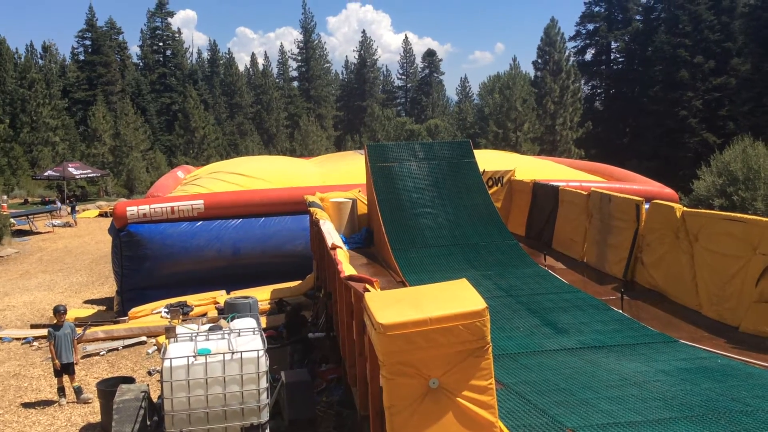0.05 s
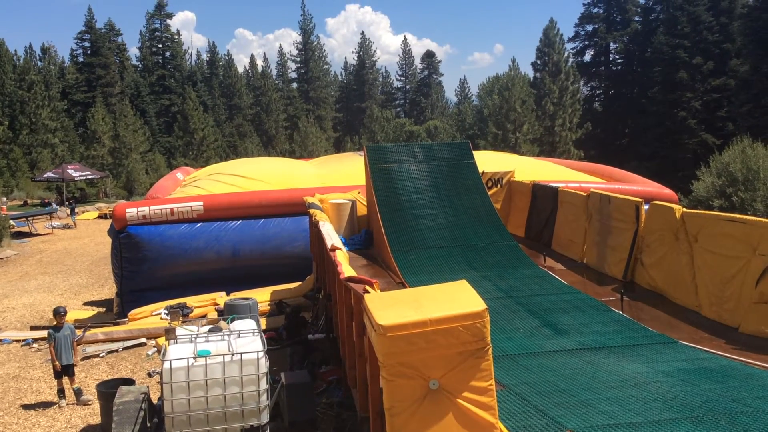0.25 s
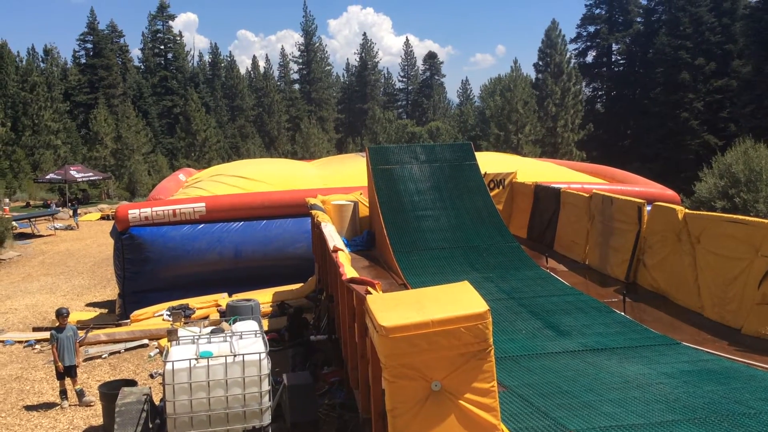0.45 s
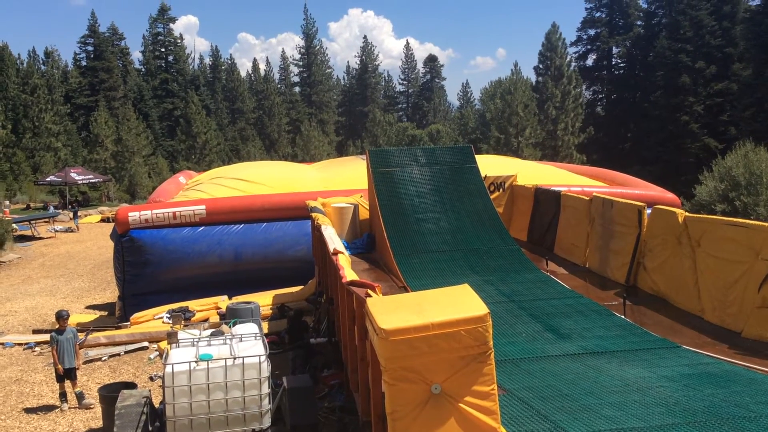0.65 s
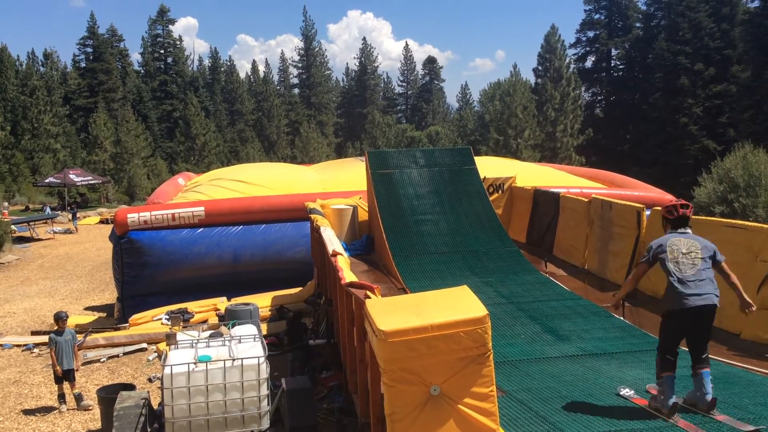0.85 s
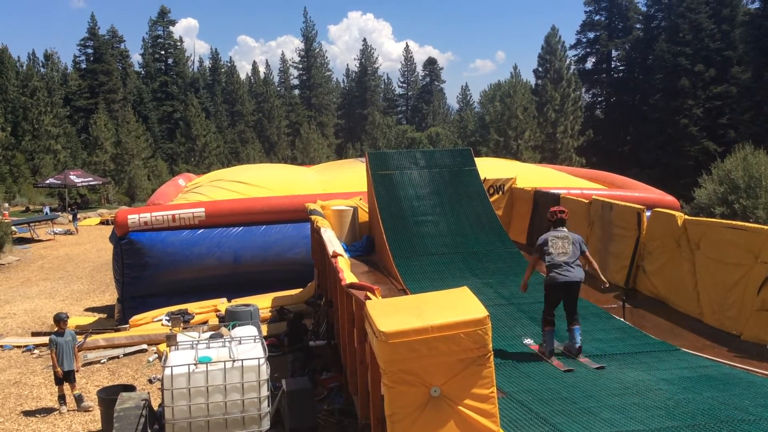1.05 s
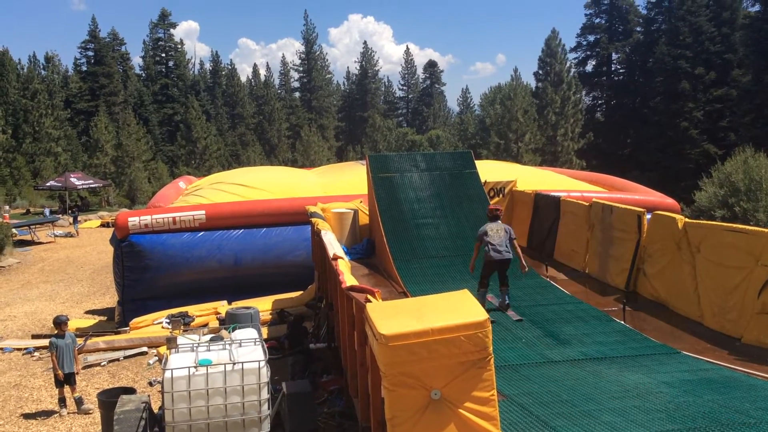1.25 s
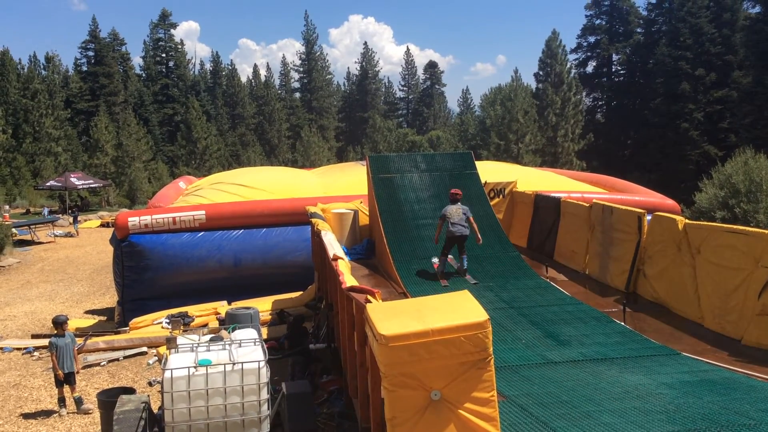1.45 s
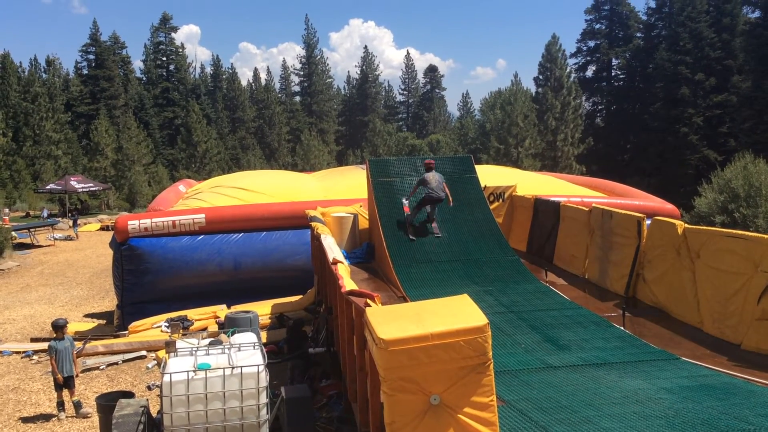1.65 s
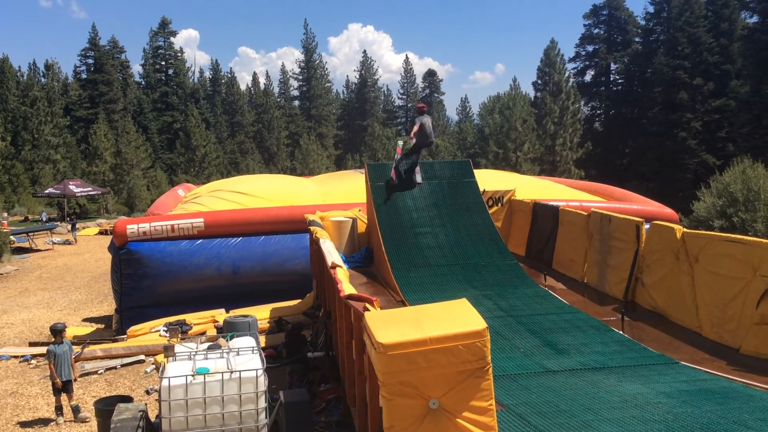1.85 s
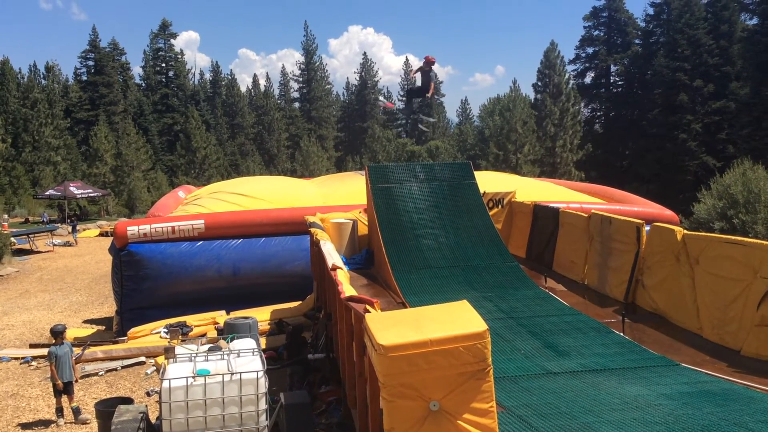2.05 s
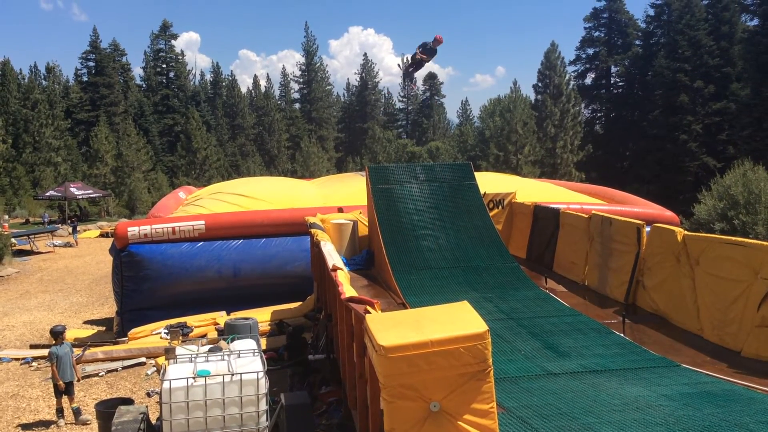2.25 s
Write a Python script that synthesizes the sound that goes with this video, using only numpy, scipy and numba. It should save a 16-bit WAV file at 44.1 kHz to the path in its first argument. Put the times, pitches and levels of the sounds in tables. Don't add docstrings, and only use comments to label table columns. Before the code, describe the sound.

Skis rush past and up a plastic bristle-mat jump ramp with loud rasping hiss, then airborne quiet

```python
import sys
import numpy as np
from scipy import signal
from scipy.io import wavfile
from scipy.ndimage import uniform_filter1d
from numba import njit

SR = 44100
rng = np.random.default_rng(int(sys.argv[2]) if len(sys.argv) > 2 else 0)


def how_loud(loudness_db):
    steps = np.asarray(loudness_db, float) / 20
    return 10 ** steps


def store_pcm(level_fs):
    pcm = np.round(np.clip(level_fs, -1, 1) * 32767).astype(np.int16)
    wavfile.write(sys.argv[1], SR, np.atleast_2d(pcm).T)


N = 101429

# f/Hz, density/dB per Hz
AIR_SPECTRUM = [(18, -36), (30, 3), (113, 6.5), (404, -40), (538, -10), (953, -22), (1650, -20.5),
                (1780, -17.5), (15000, -52)]
# f/Hz, width/Hz, level/dB
FAN_HUM = [(90, 72, -50), (117.3, 8.7, -62), (160, 49, -50)]

# t/s, level/dB
DECK_DRUMMING = [(0, -49.5), (.13, -48), (.3, -41), (.5, -32.5), (.68, -38), (.8, -30.5), (.92, -43.5),
                 (1.15, -48), (1.35, -44.5), (1.65, -44), (1.97, -41), (2.08, -54), (2.14, -51),
                 (2.19, -52), (2.25, -68), (2.3, -47)]
# f/Hz, width/Hz, level/dB
BOARD_MODES = [(72, 45, -4), (130, 64, -2), (184, 51, -6.5), (276, 99, -8)]
# t/s, peak/dB, f/Hz, ring T60/ms
BOARD_THUMPS = [(0.141, -28.5, 88.5, 120), (0.207, -30.5, 325, 44), (0.386, -15.5, 160, 29),
                (0.391, -35, 100, 98), (.43, -32, 61.5, 160), (0.433, -24.5, 202, 67),
                (0.443, -19.5, 270, 31), (0.494, -21.5, 252, 27), (0.526, -23, 140, 79),
                (0.558, -26, 253, 130), (.626, -23.5, 168, 64), (0.728, -21.5, 160, 130),
                (0.73, -28.5, 272, 190), (0.819, -25, 304, 100), (0.829, -24.5, 157, 105),
                (1.047, -23.5, 145, 23), (1.1, -29.5, 92.7, 160), (1.166, -26, 154, 80),
                (1.801, -33.5, 84, 88), (0.744, -26, 203, 71), (1.932, -47, 130, 170),
                (1.992, -48, 140, 120)]

# t/s, peak/dB, rasp re peak/dB, snap re peak/dB, length/ms
JOINT_SLAPS = [(0.136, -39.5, -15, -25, 14), (0.203, -40, 4.5, 6, 8), (0.381, -24.5, 6, 0, 6.8),
               (.386, -24.5, -2, 7, 6.5), (0.443, -37.5, 8, -20, 21), (0.491, -30, 6, -20, 12.5),
               (0.52, -25.5, 1.5, -21, 16), (0.551, -25, 5, -31, 8.2), (0.561, -26, -21, -25, 7.5),
               (0.621, -25, 5, -6, 18), (0.641, -34, 11, -4, 8.9), (0.673, -29.5, -4, 0, 9.7),
               (0.723, -27, 12.5, -9, 17), (0.729, -31, 3, -14, 4.6), (0.766, -42, 15, 4, 5.6),
               (0.941, -37, -8, -18, 3.5), (1.045, -37, 1, -20, 8), (1.157, -29.5, 8.5, -14, 6.6),
               (1.163, -26.5, -1.5, -14, 17), (1.538, -33, -3, -22, 15), (1.65, -31, -2, -24, 25),
               (2.188, -51, 12, -4, 5.8)]
# f/Hz, width/Hz, level/dB
CRACK_MODES = [(547, 550, 3), (806, 840, 1.5), (1120, 880, 9), (1510, 680, -8)]
# f/Hz, width/Hz, level/dB
SNAP_MODES = [(5230, 760, 3), (9500, 3300, 7.5), (12600, 3200, -24)]

# t/s,
# peak/dB, f/Hz, half length/ms
SNAGS_AND_RINGS = [(.388, -26, 540, 3.7), (.527, -32, 895, 3), (.558, -30, 760, 2.8), (.63, -33.5, 900, 3.4),
                   (.73, -27.5, 1010, 3), (1.157, -32, 1890, 1.9), (.556, -17, 2830, 3.8),
                   (0.574, -20.5, 3140, 3.4), (0.595, -23, 2800, 4), (0.613, -21, 3000, 4),
                   (.628, -15, 3080, 3.1), (0.642, -23, 3000, 4), (.655, -39, 3160, 4), (0.665, -27, 3000, 3),
                   (.676, -17.5, 3090, 4), (0.692, -18, 3130, 2.1), (.711, -20, 3000, 4),
                   (.729, -18.5, 2010, 2.1), (.736, -21, 3000, 2.1), (.748, -23, 3000, 2.8),
                   (0.77, -21, 2800, 7.2), (0.786, -29, 2900, 3.7), (0.799, -27.5, 2720, 6.6),
                   (0.818, -31, 3050, 4), (0.843, -26, 3000, 7.7), (0.869, -30, 3000, 3.6),
                   (0.882, -31, 3100, 3.5), (.872, -33, 2040, 7), (.892, -35, 2200, 5), (.946, -34, 1180, 4),
                   (.942, -31, 3000, 4), (1.161, -43, 2780, 2.5), (1.17, -41, 3200, 3.4),
                   (1.781, -34, 3370, 6.6), (1.815, -31, 3000, 7.5), (1.835, -35.5, 1200, 15),
                   (1.869, -34, 1150, 8.8), (1.946, -33, 3270, 4.3), (1.956, -34, 1390, 8),
                   (1.975, -27, 2830, 5), (2.005, -28.5, 1218, 13), (2.026, -32, 1100, 7),
                   (1.94, -38, 710, 5.1), (1.965, -32, 915, 8.7), (1.985, -32, 604, 5), (2.11, -52, 1190, 7.3),
                   (2.19, -41, 2900, 1.1), (2.192, -52, 1500, 3.5)]

# t/s, rasp level/dB, sizzle re rasp/dB, pressing load re rasp/dB
SLIDE_LEVELS = [(0, -54, -6.5, 2), (.17, -52, -4.5, -9), (.21, -47, 7, -7.5), (.35, -40, 3, -16.5),
                (.52, -38.5, 2, -14), (.565, -29, -11.5, -13.5), (.66, -25.5, -13.5, -19),
                (.82, -27.5, -11, -10.5), (.9, -33.5, -6, -8.5), (1.0, -36.5, -7.5, -11.5),
                (1.1, -40, -11.5, -5), (1.3, -38, -6.5, -10.5), (1.46, -42.5, -12.5, -1),
                (1.8, -32.5, -6.5, -4.5), (1.97, -31, -16, -10), (2.05, -35.5, -11, -3.5),
                (2.11, -54, -4.5, -6), (2.17, -60, -14, -10)]
# f/Hz, width/Hz, level/dB
RASP_MODES = [(2981, 612, 4), (2263, 790, -2), (3210, 2000, -8), (4685, 760, -11.5)]
# f/Hz, width/Hz, level/dB
SIZZLE_MODES = [(8356, 1020, 3.5), (9150, 1320, 3), (5000, 700, -2.5), (10250, 2200, -5)]
# f/Hz, width/Hz, level/dB
SPRAY_MODES = [(10360, 3400, 2.5), (13800, 4600, -9), (6900, 1700, 0.5)]
# f/Hz, width/Hz, level/dB
LOAD_MODES = [(1214, 770, 1.5), (1754, 670, 2.5), (635, 220, -10), (4000, 460, -20)]
# f/Hz, width/Hz, level/dB
EDGE_MODES = [(5000, 720, -1), (3960, 700, -4.5)]
# f/Hz, width/Hz, level/dB
LIP_MODES = [(1150, 330, 1.5), (560, 280, -5), (790, 370, -5), (140, 26, 0.5)]
# f/Hz, width/Hz, level/dB
FACE_MODES = [(6960, 2800, 5), (13900, 3500, -23)]
# f/Hz, width/Hz, level/dB
CORE_MODES = [(3000, 1000, 0), (2550, 570, -3.5), (3480, 450, -8)]

AIR_DB = -45.5
ECHO_T60_S, ECHO_DB = 0.26, -11
KNOCKS_PER_S, KNOCK_SPREAD_DB = 260, 2.5
SQUEAK_S, SQUEAK_HALF_S, SQUEAK_DB = 0.922, 0.02, -35.5
SQUEAK_HZ, SQUEAK_SAG_HZ_PER_S = 1720, 1200
FLICKS_PER_S, FLICK_SPREAD_DB = 9000, 2.5
SURGE_DB, FLUTTER_DB = 0.84, 1
PASS_S, PASS_FADE_S = 0.81, 0.12
SPRAY_NEAR_DB, SPRAY_FAR_DB = -7, -28.5
EDGE_DB, EDGE_S, EDGE_HALF_S = -8, 0.96, 0.19
CORE_DB, CORE_S, CORE_HALF_S = -3, 0.66, 0.12
KICKER_S = 1.957
LIP_DB, LIP_RISE_S = -3, 0.098
FACE_DB, FACE_RISE_S = -12.5, 0.37
TOP_HZ = 15250


def level(x, db):
    return x * how_loud(db) / np.sqrt(np.mean(x ** 2))


def curve(table, column):
    rows = np.array(table, float)
    return np.interp(np.arange(N) / SR, rows[:, 0], rows[:, column])


@njit
def svf(x, hz, width):
    y, band, low = np.empty(len(x)), 0., 0.
    g, k = np.tan(np.pi * hz / SR), width / hz
    for i in range(len(x)):
        v = (band + g * (x[i] - low)) / (1 + g * (g + k))
        band, low, y[i] = 2 * v - band, low + 2 * g * v, k * v
    return y


def steep(x, hz, width):
    once = svf(x, 1. * hz, 1.37 * width)
    return svf(once, 1. * hz, 1.37 * width)


def walk(rate_hz):
    k = SR / rate_hz
    knots = rng.standard_normal(N // 100)
    line = np.interp(np.arange(N) / k, np.arange(len(knots)), knots)
    w = uniform_filter1d(line, int(k))
    return (w - w.mean()) / w.std()


def noise():
    return rng.standard_normal(N)


def flicks(rate_per_s, spread_db):
    hit, sign, size = rng.random((3, N))
    height = how_loud(-spread_db * np.log(size + .01))
    return (hit < rate_per_s / SR) * np.sign(sign - .5) * height + 1e-18


def bristles():
    return flicks(FLICKS_PER_S, FLICK_SPREAD_DB)


def knocks():
    return flicks(KNOCKS_PER_S, KNOCK_SPREAD_DB)


def body(modes, source, flutter_db):
    out = 0
    for hz, width, db in modes:
        ring = level(steep(source(), hz, width), 0)
        out = out + how_loud(db + flutter_db * walk(29.87)) * ring
    return level(out, 0)


def air():
    out, rows = 0, np.array(AIR_SPECTRUM, float)
    for hz in 35 * 2 ** np.arange(0, 8.8, .5):
        density_db = np.interp(np.log(hz), np.log(rows[:, 0]), rows[:, 1])
        band_db = density_db + 10 * np.log10(hz) + 2 * walk(11.96)
        out = out + how_loud(band_db) * level(steep(noise(), hz, hz / 3), 0)
    return level(out, AIR_DB - 3.5)


def fans():
    out = 0
    for hz, width, db in FAN_HUM:
        out = out + level(steep(noise(), hz, width), db) * how_loud(2.1 * walk(5.27))
    return out


def deck():
    return how_loud(curve(DECK_DRUMMING, 1)) * body(BOARD_MODES, knocks, 1.9)


def thumps():
    out = np.zeros(N)
    for s, db, hz, t60_ms in BOARD_THUMPS:
        age = np.clip(np.arange(N) / SR - s, 0, None)
        phase = 2 * np.pi * hz * (age + 0.0014 * (1 - np.exp(-age / 0.0026)))
        env = how_loud(db - 60000 * age / t60_ms) * (1 - np.exp(-age / 0.0012))
        out = out + env * (np.sin(phase) + 0.43 * np.sin(1.43 * phase))
    return out


def slaps():
    t, out = np.arange(N) / SR, np.zeros(N)
    crack = body(CRACK_MODES, noise, 0)
    rasp = body(RASP_MODES, noise, 0)
    snap = body(SNAP_MODES, noise, 0)
    for s, db, rasp_db, snap_db, ms in JOINT_SLAPS:
        age = np.clip((t - s) * 1000 / ms, 0, 30)
        env = (1 - np.exp(-age / 0.23)) * np.exp(-age ** 2 / 0.98)
        out = out + env * how_loud(db - 5) * (crack + how_loud(rasp_db) * rasp + how_loud(snap_db) * snap)
    return out


def snags():
    t, blur, out = np.arange(N) / SR, walk(500), np.zeros(N)
    for s, db, hz, half_ms in SNAGS_AND_RINGS:
        env = how_loud(db) * np.exp(-((t - s) * 1000 / half_ms) ** 2)
        out = out + env * np.sin(2 * np.pi * hz * (t - s) + blur)
    return out


def squeak():
    out = 0
    for lead_s, ratio, db in ((0, 1, 0), (.004, 1.17, -6)):
        t = np.arange(N) / SR - SQUEAK_S + lead_s
        phase = 2 * np.pi * ratio * (SQUEAK_HZ * t - SQUEAK_SAG_HZ_PER_S * t ** 2 / 2)
        env = how_loud(SQUEAK_DB + db) * np.exp(-(t / SQUEAK_HALF_S) ** 2)
        out = out + env * (1 + .6 * walk(150)) * np.sin(phase + 1.2 * walk(170))
    return out


def swell(db, centre_s, half_s):
    t = np.arange(N) / SR
    return how_loud(db) * np.exp(-((t - centre_s) / half_s) ** 2)


def approach(db, rise_s):
    t = np.arange(N) / SR
    return how_loud(db) * np.exp(np.minimum(t - KICKER_S, 0) / rise_s)


def skis():
    t = np.arange(N) / SR
    rasp_db = curve(SLIDE_LEVELS, 1) + SURGE_DB * walk(13.87) + FLUTTER_DB * walk(69.48)
    sizzle_db = curve(SLIDE_LEVELS, 2)
    load_db = curve(SLIDE_LEVELS, 3) + 0.55 * walk(10.5)

    past = .5 + .5 * np.tanh((t - PASS_S) / PASS_FADE_S)
    spray_db = SPRAY_NEAR_DB * (1 - past) + SPRAY_FAR_DB * past
    spray = how_loud(spray_db) * body(SPRAY_MODES, bristles, 0.43)

    rasp = body(RASP_MODES, bristles, 0.26)
    tips = how_loud(sizzle_db) * (body(SIZZLE_MODES, bristles, 0.94) + spray)
    load = how_loud(load_db) * body(LOAD_MODES, bristles, 1)
    edge = swell(EDGE_DB, EDGE_S, EDGE_HALF_S) * body(EDGE_MODES, bristles, 0.49)
    core = swell(CORE_DB, CORE_S, CORE_HALF_S) * body(CORE_MODES, bristles, 0.44)
    lip = approach(LIP_DB, LIP_RISE_S) * body(LIP_MODES, bristles, 0.49)
    face = approach(FACE_DB, FACE_RISE_S) * body(FACE_MODES, bristles, 1)
    return how_loud(rasp_db) * (rasp + tips + how_loud(-12.5) * spray + load + edge + core + lip + face)


def echo(near):
    t = np.arange(SR // 2) / SR
    tail = rng.standard_normal(len(t)) * how_loud(-60 * t / ECHO_T60_S) * (t > .012)
    tail = signal.lfilter([.5], [1, -.5], tail / np.sqrt(np.sum(tail ** 2)))
    return how_loud(ECHO_DB) * signal.fftconvolve(near, tail)[:N]


def scene():
    floor = air() + fans()
    near = deck() + thumps() + slaps() + snags() + squeak() + skis()
    return (floor + near + echo(near))[None]


def roll_off(x):
    return signal.sosfilt(signal.butter(12, 15450, fs=SR, output="sos"), x)


def record(dry):
    bass_cut = signal.butter(2, 45, "high", fs=SR, output="sos")
    top_cut = signal.ellip(8, .3, 60, TOP_HZ, fs=SR, output="sos")
    mix = signal.sosfilt(top_cut, signal.sosfilt(bass_cut, dry))
    return roll_off(mix)


dry = scene()
out = record(dry)
store_pcm(out)
```